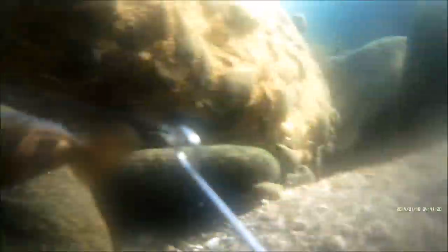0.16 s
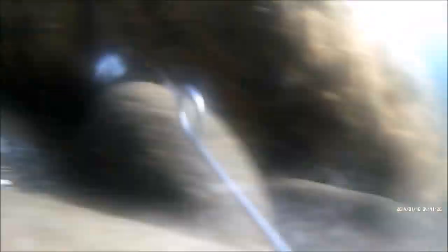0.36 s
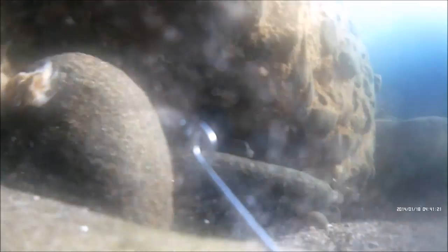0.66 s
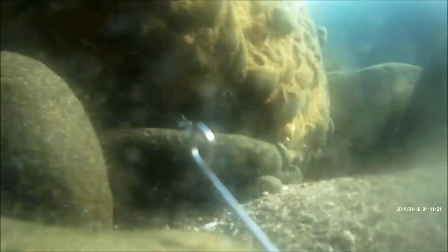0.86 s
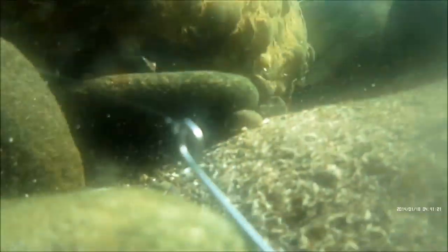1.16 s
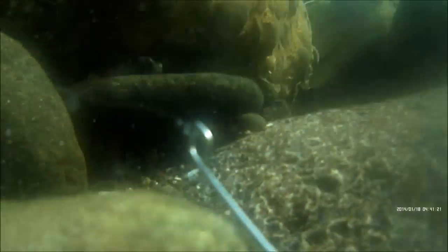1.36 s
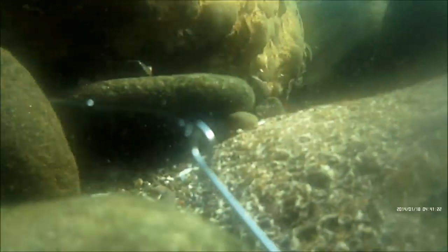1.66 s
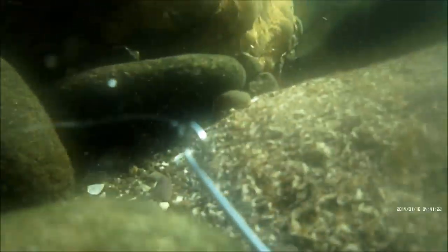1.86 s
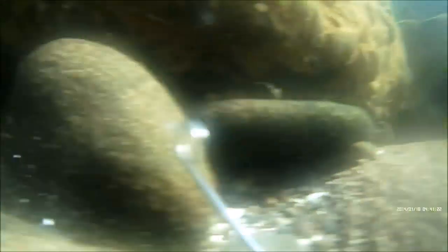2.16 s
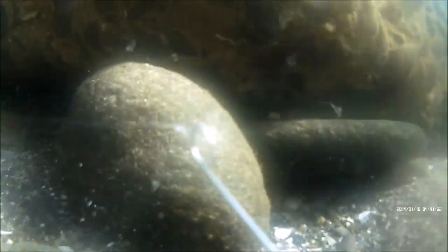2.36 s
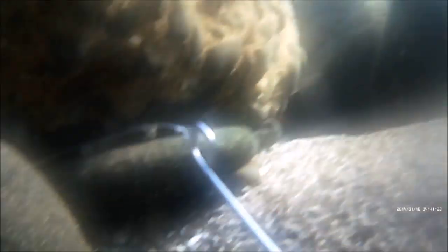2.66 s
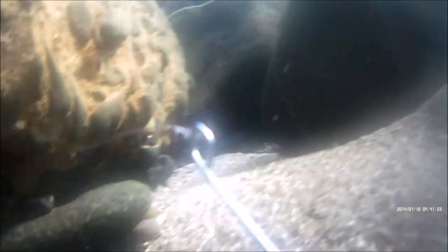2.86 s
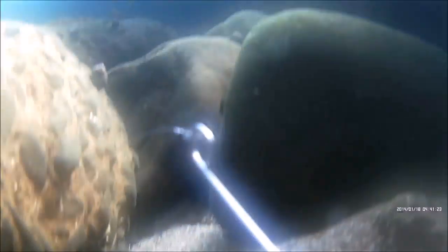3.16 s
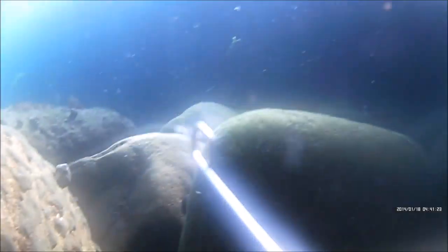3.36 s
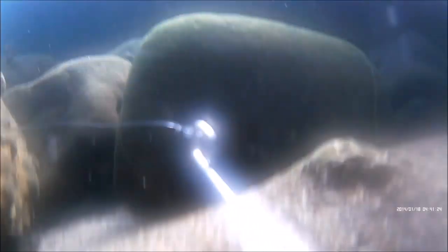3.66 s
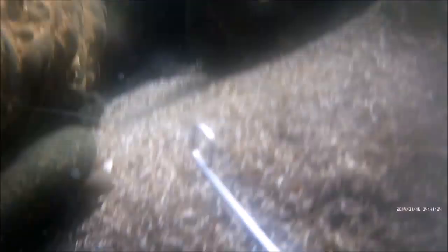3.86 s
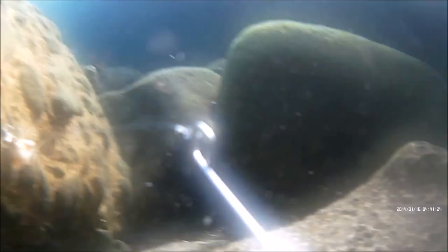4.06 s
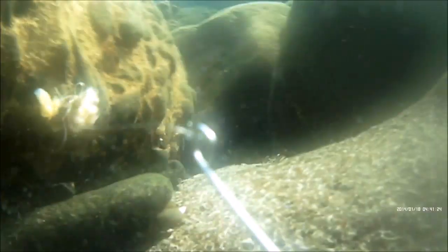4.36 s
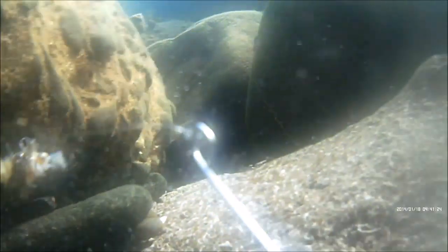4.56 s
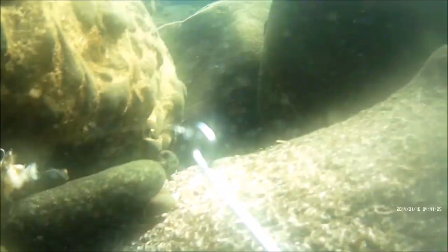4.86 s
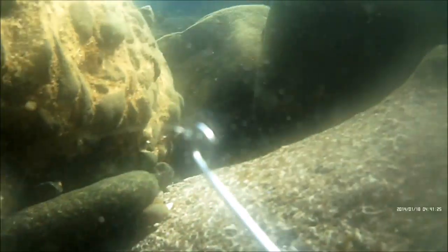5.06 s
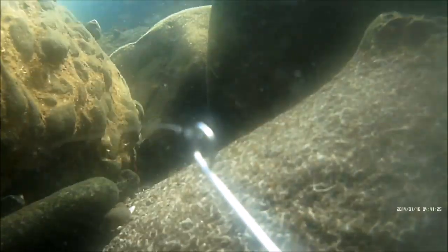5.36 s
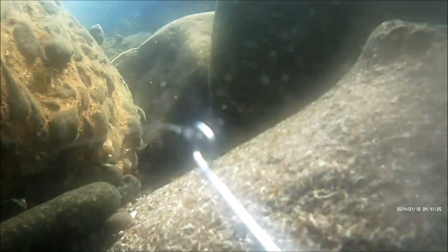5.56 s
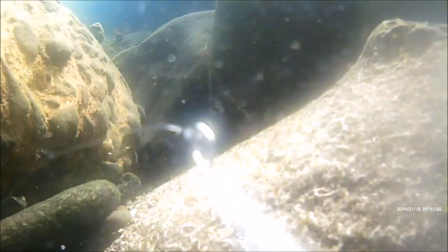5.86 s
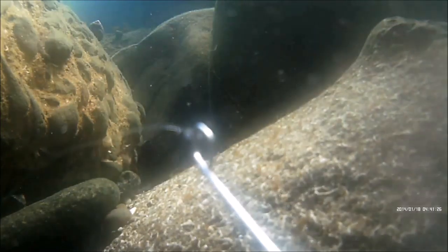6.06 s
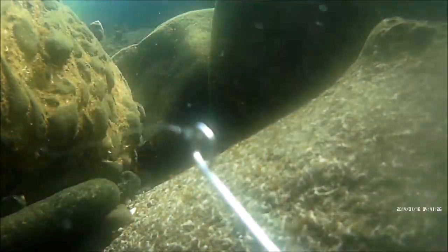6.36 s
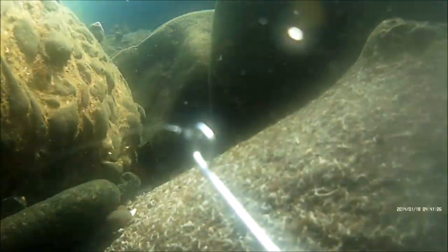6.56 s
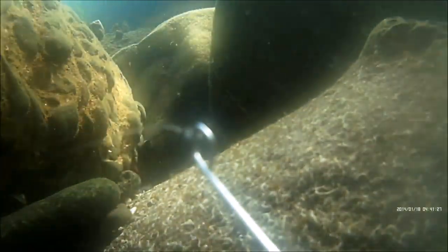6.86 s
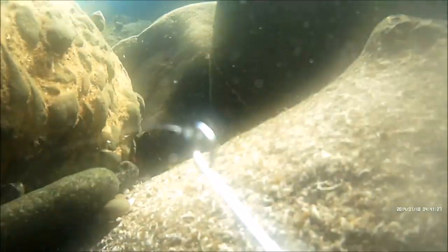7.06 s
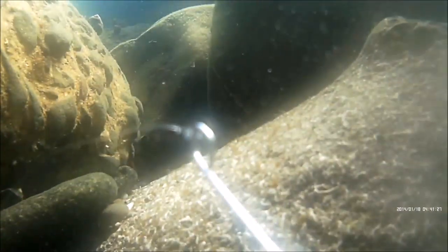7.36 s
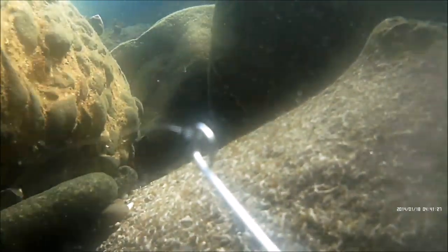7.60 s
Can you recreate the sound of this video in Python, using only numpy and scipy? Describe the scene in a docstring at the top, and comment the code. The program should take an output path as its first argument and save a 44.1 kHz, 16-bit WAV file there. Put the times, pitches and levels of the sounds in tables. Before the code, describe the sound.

Heard from inside a waterproof housing underwater: stone groans low against the shell, gravel crunches and grit snaps between dull thumps. After a weaker stretch, a harsh rasp and hissing slide lead into hard, hollow clacks that leave the rig trembling. A calm follows, then more bumps and a heavy drop onto gravel. Small crunches and knocks thin out to faint rumble and hiss, with a few late scuffs.

```python
"""A camera in a waterproof housing is dragged over boulders and gravel on the seabed, then settles.
From the start stone groans, gravel crunches, grit snaps and blows thump the rig and ring its modes.
At 2 s random slips drive the shell's resonances: a harsh rasp, then a hissing slide and short jerks.
Harder blows follow, some leaving the rig trembling; at 4.3 s it drops onto gravel and soon sinks in.
Late drags and swishes of filtered noise fade into the rumble and hiss that lie under it all."""
import sys
import numpy as np
from scipy import signal
from scipy.fft import rfft, irfft
from scipy.io import wavfile
from scipy.ndimage import uniform_filter1d

SR = 44100
rng = np.random.default_rng(int(sys.argv[2]) if len(sys.argv) > 2 else 0)


def generate_wav(signal):
    """Clip the signal to [-1, 1] and save it as 16-bit WAV at the path in sys.argv[1]."""
    frames = np.transpose(np.atleast_2d(signal))
    scaled = np.clip(frames, -1, 1) * 32767
    pcm = np.round(scaled).astype(np.int16)
    wavfile.write(sys.argv[1], SR, pcm)


N = 340893
TIME = np.arange(N) / SR
# when the rig drops onto the gravel, and when it has sunk in
TOUCHDOWN_S, SETTLE_S = 4.3, 4.6


def undb(db):
    """Decibels to gain."""
    return 10 ** (np.asarray(db) / 20)


def unit(x):
    """Scale to rms 1."""
    return x / np.sqrt(np.mean(x ** 2))


def burst(x, seconds):
    """Scale a hit to rms 1 over its first moments."""
    return x / np.sqrt(np.mean(x[:int(seconds * SR)] ** 2))


def add(out, start_s, x):
    """Mix a sound in at its start time."""
    i = max(int(start_s * SR), 0)
    out[i:i + len(x)] += x[:N - i]


def colour(x, points):
    """Shape the spectrum of a steady sound by (f/Hz, level/dB) points."""
    hz, db = np.transpose(points)
    f = np.maximum(np.arange(N // 2 + 1) * SR / N, 1)
    gain = undb(np.interp(np.log(f), np.log(hz), db))
    return irfft(rfft(x) * gain, N)


def band(x, hz, kind, order=2):
    """Butterworth filter."""
    return signal.sosfilt(signal.butter(order, hz, kind, fs=SR, output="sos"), x)


def resonate(x, modes, gains):
    """Steep parallel resonances, each with a strength set by the point of contact."""
    out = 0
    for gain, (hz, width, db) in zip(gains, modes):
        section = np.concatenate(signal.iirpeak(hz, hz / width, SR))
        # the same peak twice in a row makes the skirts steep
        out = out + gain * undb(db) * signal.sosfilt([section, section], x + 1e-18)
    return out


def roam(x, modes, rate, spread_db):
    """A travelling contact keeps favouring other resonances."""
    gains = [undb(spread_db * walk(rate)) for _ in modes]
    return unit(resonate(x, modes, gains))


def ring(t, modes, tilt_db, detune, scatter_db):
    """Decaying modes, tilted by tilt_db an octave and a little different at every blow."""
    out = 0
    chances = rng.standard_normal((len(modes), 2))
    for (hz, db, t60), (size, shift) in zip(modes, chances):
        gain = undb(db + scatter_db * size + tilt_db * np.log2(hz / modes[0][0]))
        decay = np.exp(-np.log(1000) * t / t60)
        out = out + gain * decay * np.sin(2 * np.pi * hz * (1 + detune * shift) * t)
    return out


def walk(rate):
    """Smooth random drift with a spread near 1, drawing about rate new values a second."""
    k = int(SR / rate)
    steps = np.repeat(rng.standard_normal(N // k + 1), k)
    return 1.2 * uniform_filter1d(steps, k)[:N]


def slips(rate, spread_db):
    """Tiny slips at random moments, about rate a second, of uneven size and either sign."""
    happens = rng.random(N) < rate / SR
    sign = rng.choice([-1, 1], N)
    size = undb(spread_db * np.minimum(rng.exponential(size=N), 4))
    return happens * sign * size


def strokes(rows, attack_s, release_s, sag_db_per_s, axis=2):
    """Gain of strokes: each rises, sags while it lasts, then dies away; axis picks the level column."""
    gain = np.zeros(N)
    for row in rows:
        start_s, length, db = row[0], row[1], row[axis]
        t = TIME[:int((length + 10 * release_s) * SR)]
        rise = np.minimum(t / attack_s, 1)
        release = np.exp(-np.maximum(t - length, 0) / release_s)
        add(gain, start_s, undb(db - sag_db_per_s * t) * rise * release)
    return gain


# blows on the rig: t/s, thump level/dB, housing ring level/dB, hard clack level/dB
BLOWS = [(0.153, -15.5, -24.5, -28), (0.185, -52, -31, -30.5), (0.273, -48, -25.5, -39.5),
         (.353, -18, -29.5, -41), (1.156, -52, -31, -63), (1.938, -37, -35.5, -55),
         (2.33, -8.5, -21, -16.5), (2.398, -31, -29, -40.5), (2.5574, -15.5, -27.5, -22),
         (2.7106, -9.5, -25, -18.5), (2.882, -30, -39, -52.5), (3.766, -27, -37, -33.5),
         (3.788, -14, -30, -40), (3.82, -19, -36, -31), (3.846, -22.5, -36, -56), (3.880, -22.5, -53, -37),
         (4.063, -24.5, -28.5, -43), (4.171, -22, -29.5, -50.5), (4.385, -4, -19.5, -21.5),
         (4.388, -6, -15.5, -28), (4.476, -24.5, -25, -25.5), (4.561, -40, -34, -45.5),
         (5.09, -48, -40.5, -59), (5.279, -15.5, -20.5, -37), (5.347, -12, -27.5, -54),
         (5.39, -30, -39.5, -43), (5.654, -33.5, -52, -61), (7.208, -67, -58, -57),
         (7.328, -36.5, -45.5, -43), (7.463, -62, -65, -63), (7.694, -46, -43, -52)]
# modes of the housing on its pole, before tilt and scatter: f/Hz, level/dB, t60/s
HOUSING_MODES = [(93, -1, 0.022), (113, -0.5, 0.067), (171.2, 7.5, 0.18), (171.2, -8, 0.47),
                 (235, -7, 0.013), (254.7, 5.5, 0.11), (283, -16, 0.071)]
# short modes of the wall under a blow, before tilt, scatter and damping: f/Hz, level/dB, t60/s
WALL_MODES = [(546, -3.5, 0.12), (570, 0.5, 0.13), (611, 3, 0.045), (734, -0.5, 0.039), (810, -3.5, 0.039),
              (950, -1, 0.022), (1170, -12.5, 0.036), (1376, -14.5, 0.047), (1631, -12.5, 0.022),
              (2800, -18.5, 0.012)]
CONTACT_MS = 6.3  # how long a blow pushes
WALL_DAMPING_S = .03  # time constant of the extra decay in water
WALL_TILT_DB = 3  # per octave across the wall modes, for a full clack
# weaker clacks lose DULLING_DB per octave for every dB below a full one; harder ones gain it
FULL_CLACK_DB, DULLING_DB = -19.5, 0.4
CRACK_DB = -27  # noisy crack under the clack


def knocks():
    """Each blow shoves the rig, rattles and rings the housing and clacks on its wall."""
    out, t = np.zeros(N), TIME[:SR // 2]
    push = np.sin(np.pi * np.minimum(t * 1000 / CONTACT_MS, 1)) ** 2
    for start_s, thump_db, ring_db, clack_db in BLOWS:
        # pressed into the gravel, the rig springs back faster
        rebound_hz = [24, 65] if start_s < TOUCHDOWN_S else [42, 120]
        rebound = band(push, rebound_hz, "band", order=1)
        thump = burst(rebound + undb(-5) * band(push, 57, "high"), 0.0059)

        rattle = band(rng.standard_normal(len(t)), [80, 260], "band", order=3) * np.exp(-t / 0.013)
        housing = ring(t, HOUSING_MODES, tilt_db=-2, detune=0.075, scatter_db=3.5)
        housing = housing * (1 - np.exp(-t / 0.0025))  # soft onset
        body = burst(housing, 0.034) + undb(-6.0) * burst(rattle, 0.06)

        # a gentler blow stirs the higher modes less; the water soon stills the rest
        tilt_db = WALL_TILT_DB + DULLING_DB * (clack_db - FULL_CLACK_DB)
        wall = ring(t, WALL_MODES, tilt_db=tilt_db, detune=.025, scatter_db=4.5)
        wall = wall * np.exp(-t / WALL_DAMPING_S) * np.minimum(t / .001, 1)
        crack = band(rng.standard_normal(len(t)), [450, 1400], "band", order=2) * np.exp(-t / 0.01)
        clack = burst(wall, .02) + undb(CRACK_DB) * burst(crack, .02)

        add(out, start_s, undb(thump_db) * thump + undb(ring_db) * body - undb(clack_db) * clack)
    return out


# trembles of the rig after some blows: t/s, level/dB
TREMBLES = [(2.401, -33.5), (2.559, -28.5), (2.712, -26.5), (4.391, -33), (5.349, -47)]
# modes of the rig trembling on its pole, before tilt and scatter: f/Hz, level/dB, t60/s
TREMBLE_MODES = [(32.68, 3.5, 1.3), (181.5, -11, .45)]


def trembling():
    """After some blows the rig keeps trembling on its pole, in decaying modes, and settles unevenly."""
    out = np.zeros(N)
    for start_s, db in TREMBLES:
        tremble = ring(TIME[:2 * SR], TREMBLE_MODES, tilt_db=2.5, detune=0.013, scatter_db=1.5)
        add(out, start_s, undb(db) * tremble)
    unevenness = undb(3 * np.tanh(walk(14)) - 1)
    return out * unevenness


# drags over the seabed: t/s, length/s, groan level on stone/dB, crunch level of gravel/dB
SEABED_DRAGS = [(.12, 0.099, -24.5, -39), (.25, 0.23, -28.5, -46.5), (.49, 0.27, -24.5, -44),
                (.8, 0.069, -26.5, -48), (.895, 0.084, -30, -48.5), (.97, 0.13, -37.5, -69),
                (1.12, .12, -31, -48.5), (1.25, 0.19, -40.5, -59), (1.47, 0.88, -47, -69.5),
                (1.95, 0.19, -43, -74), (2.05, 0.29, -30.5, -69), (3.77, .16, -23, -49),
                (3.93, 0.088, -35.5, -44), (4.065, 0.063, -28.5, -57), (4.17, 0.35, -42, -76.5),
                (4.57, 0.22, -49, -59), (4.83, 0.15, -42.5, -46.5), (5.175, 0.18, -38.5, -41),
                (5.24, 0.033, -41, -32.5), (5.285, .11, -30, -45.5), (5.45, .15, -57, -58.5),
                (7.055, .15, -52.5, -58.5)]
# a brief, deep lurch of the rig: t/s, length/s, level/dB
RIG_LURCHES = [(0.497, 0.077, -14)]
# spectrum of the groan, relative: f/Hz, level/dB
GROAN_COLOUR = [(50, -23), (100, -12), (150, 2), (185, 8.5), (220, 1), (265, 5.5), (320, -4), (400, -16),
                (505, -0.5), (620, -21), (800, -17), (1200, -36), (2000, -40), (5000, -76.5)]
# spectrum of the low shudder, relative: f/Hz, level/dB
SHUDDER_COLOUR = [(15, -9), (35, 1), (60, 3.5), (110, -1), (150, -11.5), (250, -60.5), (1000, -100)]
# a drag bites, eases off and lets go
DRAG_ATTACK_S, DRAG_RELEASE_S, DRAG_SAG_DB_PER_S = 0.017, 0.02, 17.5
SHUDDER_DB = -5.5  # low shudder of the rig under its groan


def rubbing():
    """Rough stone judders along the rig in random slips, so that it groans, shudders and lurches."""
    groan = unit(colour(slips(rate=500, spread_db=-1.0), GROAN_COLOUR)) * undb(-4.0 + 2 * walk(30))
    shudder = unit(colour(rng.standard_normal(N), SHUDDER_COLOUR)) * undb(SHUDDER_DB)
    pressure = strokes(SEABED_DRAGS, DRAG_ATTACK_S, DRAG_RELEASE_S, DRAG_SAG_DB_PER_S)
    out = (groan + shudder) * pressure
    for start_s, length, db in RIG_LURCHES:
        turn = np.linspace(0, 1, int(length * SR))
        # one and a half cycles under a rounded arch
        add(out, start_s, undb(db) * np.sin(3 * np.pi * turn) * np.sin(np.pi * turn) ** .5)
    return out


# resonances of the shell's side struck by grains: f/Hz, width/Hz, level/dB
SIDE_RESONANCES = [(640, 170, 1), (880, 700, 0), (1330, 300, -5.5), (1580, 210, 3), (2040, 100, 1.5),
                   (2800, 300, -3), (3100, 180, -0.5), (3678, 320, 0.5), (4390, 200, -18), (4920, 1500, -9)]
# the same for its underside, once it has sunk onto the gravel: f/Hz, width/Hz, level/dB
BASE_RESONANCES = [(563, 165, 10), (847, 205, 5.5), (1257, 220, -3), (1650, 180, 0), (2210, 150, -19),
                   (2914, 270, -5), (2940, 1260, -6), (3720, 170, -10.5), (4170, 130, -14.5),
                   (5360, 180, -16.5)]


def gravel():
    """Small grains crunch under the shell in uneven bunches and excite its side, later its base."""
    grains = slips(rate=300, spread_db=3.5) * undb(5 * np.tanh(walk(55)))
    side = roam(grains, SIDE_RESONANCES, rate=30, spread_db=4)
    base = roam(grains, BASE_RESONANCES, rate=30, spread_db=4)
    crunch = band(np.where(TIME < SETTLE_S, side, base), 6800, "low")
    pressure = strokes(SEABED_DRAGS, DRAG_ATTACK_S, DRAG_RELEASE_S, DRAG_SAG_DB_PER_S, axis=3)
    return crunch * pressure * undb(-4.5)


# snapping grains: t/s, level/dB, sharpness (0 to 1)
GRIT_SNAPS = [(0.1365, -25.5, 0.7), (0.3726, -25.5, 0.3), (0.382, -26, 0.6), (0.4288, -30, 0.03),
              (0.5074, -32, 0.86), (0.5268, -26, 0.57), (0.7346, -30.5, 0.88), (0.806, -28.5, 0),
              (0.871, -22.5, 0), (0.931, -24.5, 0), (0.941, -33, 0), (1.2294, -41, 0.9),
              (1.2993, -30, 0.05), (1.3113, -28, 0), (1.3173, -20.5, 0.2), (1.437, -43.5, 0.94),
              (1.5468, -38.5, 0.74), (1.7213, -40.5, 0.8), (3.8234, -38, 0), (3.881, -31, 0),
              (3.9338, -21, 0.5), (4.0127, -25, 0.5), (4.066, -36, 0), (4.6087, -33.5, 0.44),
              (4.8608, -34, 0.13), (4.8905, -30, 0.15), (4.9197, -32, 0.4), (4.9606, -31.5, 0.1),
              (5.0897, -30, 0.44), (5.2225, -28, 0.4), (5.241, -24.5, 0.3), (5.268, -28, .7),
              (5.379, -21, 0.28), (5.5692, -51, 1), (5.604, -35, 0.33), (7.0631, -40.5, 0.24),
              (7.105, -53, 0.6), (7.151, -45.5, .2), (7.191, -61, 0.1)]
# resonances of the lightly touched shell, here for the grain's treble: f/Hz, width/Hz, level/dB
SLIDE_RESONANCES = [(553, 120, -0.5), (1000, 230, -18.5), (1580, 250, -18.5), (2026, 130, -10.5),
                    (2960, 170, -13.5), (3760, 580, -3.5), (4370, 550, -15), (4830, 950, -11),
                    (6600, 890, -30.5), (9950, 530, -23.5), (12000, 1100, -23.5)]
# treble of a blunt grain, gain when fully sharp, change once sunk in
EDGE_DB, SHARP_EDGE_DB, BURIED_DB = -43, 23, -4.5
# per octave across the shell's resonances for a blunt grain; added when fully sharp
BLUNT_TILT_DB, SHARP_TILT_DB = 0, 9.5


def grit():
    """Larger grains snap and crumble; a sharper one favours higher resonances and has more treble."""
    out, t = np.zeros(N), TIME[:SR // 20]
    for start_s, db, sharpness in GRIT_SNAPS:
        sunk = start_s >= SETTLE_S
        modes, muffle_db = (BASE_RESONANCES, BURIED_DB) if sunk else (SIDE_RESONANCES, 0)
        decay = np.exp(-t / 0.0019) + undb(-24.5) * np.exp(-t / 0.018)
        crumble = rng.standard_normal(len(t)) * decay * (1 - np.exp(-t / 0.00069))

        tilt_db = BLUNT_TILT_DB + SHARP_TILT_DB * sharpness
        scatter_db = 3 * rng.standard_normal(len(modes))
        octaves = np.log2(np.array(modes)[:, 0] / modes[0][0])
        snap = resonate(crumble, modes, undb(scatter_db + tilt_db * octaves))
        snap = snap / np.abs(snap).max()

        treble = resonate(crumble, SLIDE_RESONANCES, np.ones(len(SLIDE_RESONANCES)))
        edge = burst(band(treble, 6030, "high", order=4), 0.015)
        edge_db = EDGE_DB + SHARP_EDGE_DB * sharpness + muffle_db
        add(out, start_s, undb(db) * (undb(-2.5) * snap + undb(edge_db) * edge))
    return out


# the shell sliding on smooth stone: t/s, length/s, level/dB
SMOOTH_SLIDES = [(2.12, .57, -49), (4.25, 0.281, -45)]
# jerks of the sliding shell: t/s, length/s, level/dB
SHELL_JERKS = [(0.135, 0.043, -41.5), (2.127, 0.018, -29.5), (2.247, 0.041, -42.5), (2.296, .012, -26.5),
               (2.329, 0.0081, -25), (2.345, 0.013, -29.5), (2.605, 0.014, -32.5), (2.614, 0.095, -37.5),
               (3.956, 0.059, -56.5), (4.269, 0.0071, -39), (4.385, 0.012, -26.5), (4.419, 0.022, -43),
               (4.461, 0.016, -28.5), (5.154, 0.026, -40), (5.178, .045, -55)]
# resonances of the shell when scraped hard: f/Hz, width/Hz, level/dB
HARD_RESONANCES = [(500, 13, 8), (576.7, 55, 1), (877, 190, -1.5), (1615, 330, 0), (2064, 110, 4.5),
                   (3000, 940, -7), (3580, 300, -3.5), (4150, 110, 2.5), (4345, 34, 0.5), (5453, 540, -9.5),
                   (6530, 600, -6), (9600, 600, -18), (12360, 170, -7)]
SLIDE_ATTACK_S, SLIDE_RELEASE_S, SLIDE_SAG_DB_PER_S = .03, 0.016, 14


def sliding():
    """The shell hisses over smooth stone in a shower of tiny slips and catches in short jerks."""
    catching = undb(7 * np.tanh(walk(170)) + 2.5 * np.tanh(walk(35)) - 2)
    jerks = np.zeros(N)
    for start_s, length, db in SHELL_JERKS:
        add(jerks, start_s, undb(db) * signal.windows.tukey(int(length * SR), .6))
    chatter = slips(rate=2200, spread_db=3.5)
    hiss = roam(chatter, SLIDE_RESONANCES, rate=60, spread_db=2.5)

    # light contact is dull; a jerk bites hard enough to ring the whole shell
    pressure = strokes(SMOOTH_SLIDES, SLIDE_ATTACK_S, SLIDE_RELEASE_S, SLIDE_SAG_DB_PER_S)
    light = pressure * catching * band(hiss, 7000, "low", order=1)
    shell = unit(resonate(chatter, HARD_RESONANCES, np.ones(len(HARD_RESONANCES))))
    bite = undb(-0.5) * hiss + undb(-11) * shell
    crunch = undb(-15) * unit(band(chatter, 5700, "low", order=1))
    return light + jerks * undb(1.2 * np.tanh(walk(300))) * (bite + crunch)


# the harsh scrape: t/s, length/s, level/dB
HARSH_SCRAPES = [(2.017, 0.082, -23)]
RASP_ATTACK_S, RASP_RELEASE_S, RASP_SAG_DB_PER_S = 0.0011, 0.0067, 40.5


def rasp():
    """A hard edge bites the stone and chatters, ringing the whole shell."""
    chatter = slips(rate=4000, spread_db=2.5) * undb(2 * np.tanh(walk(400)))
    shell = roam(chatter, HARD_RESONANCES, rate=40, spread_db=1.5)
    crunch = unit(band(chatter, 2400, "low", order=1))
    pressure = strokes(HARSH_SCRAPES, RASP_ATTACK_S, RASP_RELEASE_S, RASP_SAG_DB_PER_S)
    return (shell + undb(-13.5) * crunch) * pressure


# water swishing round the housing: t/s, length/s, level/dB
WATER_SWISHES = [(3.48, 0.1, -71), (3.66, 0.055, -62), (7.06, .12, -55), (7.41, 0.37, -61.5)]
# spectrum of the rumble and hiss, relative: f/Hz, level per Hz/dB
WATER_COLOUR = [(12, -36), (20, -3), (70, -6), (88, -19), (150, -16), (228, -29.5), (410, -28.5),
                (459, -29.5), (759, -36), (1060, -38), (1610, -40), (1760, -39.5), (3740, -43),
                (14300, -42.5), (16000, -46)]
WATER_DB = -56.5  # rms of rumble and hiss before the surge
SWISH_ATTACK_S, SWISH_RELEASE_S, SWISH_SAG_DB_PER_S = 0.055, 0.048, 30


def water():
    """Slowly surging rumble under an even hiss, with a soft swish when the rig drifts."""
    noise = unit(colour(rng.standard_normal(N), WATER_COLOUR)) * undb(WATER_DB)
    surge = band(noise, 600, "low") * (undb(2 * walk(4.4)) - 1) * 0.65
    drift = strokes(WATER_SWISHES, SWISH_ATTACK_S, SWISH_RELEASE_S, SWISH_SAG_DB_PER_S)
    wash = unit(band(rng.standard_normal(N), [350, 700], "band"))
    swish = wash * drift * undb(-2.5 + 6.2 * walk(25))
    return noise + surge + swish


def scene():
    """Everything reaches the one microphone through the housing."""
    blows = knocks() + trembling()
    contact = rubbing() + gravel() + grit() + sliding() + rasp()
    return (blows + contact + water())[None]


TOP_HZ = 15700  # upper limit of the sound


def record(dry):
    """The hardest blows are rounded by overload; the top is cut."""
    rounded = dry / (1 + dry ** 6) ** (1 / 6)
    return signal.sosfilt(signal.ellip(8, .2, 70, TOP_HZ, fs=SR, output="sos"), rounded)


dry = scene()
out = record(dry)
generate_wav(out)
```